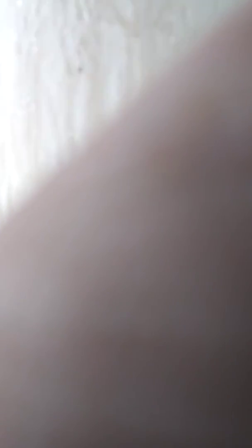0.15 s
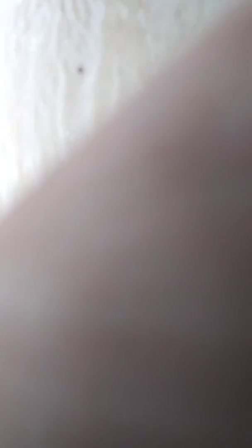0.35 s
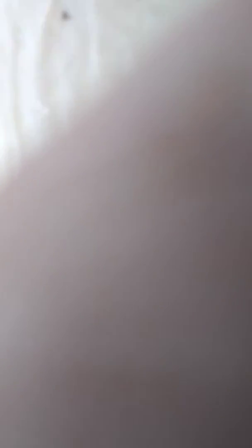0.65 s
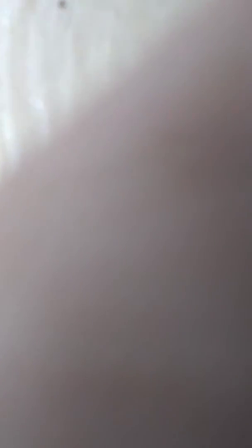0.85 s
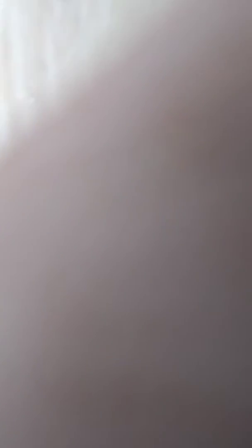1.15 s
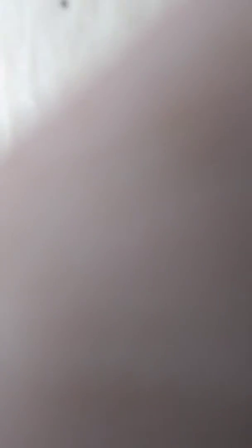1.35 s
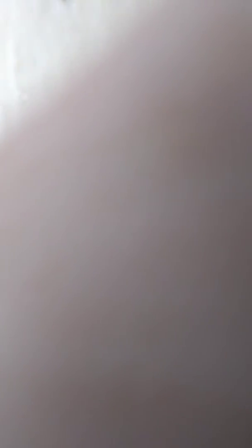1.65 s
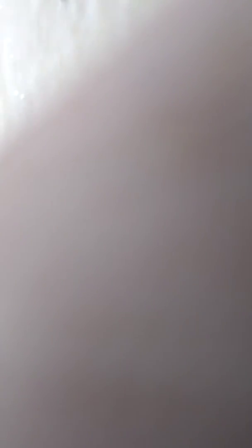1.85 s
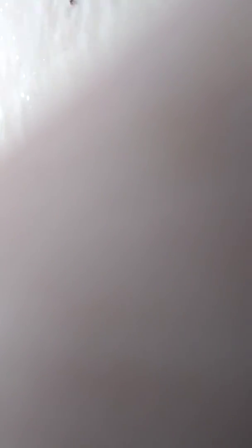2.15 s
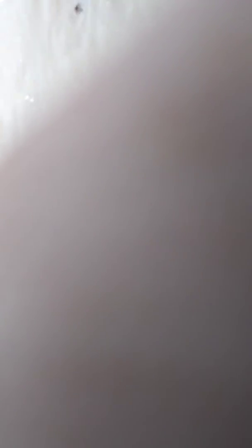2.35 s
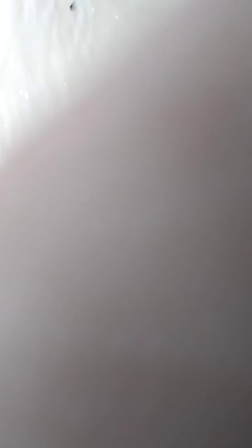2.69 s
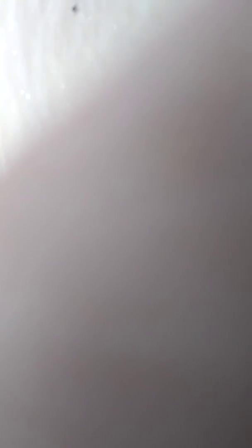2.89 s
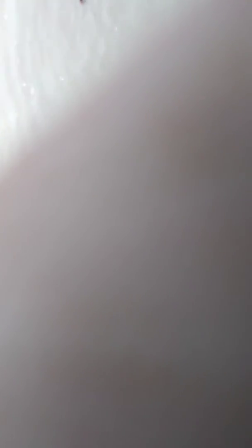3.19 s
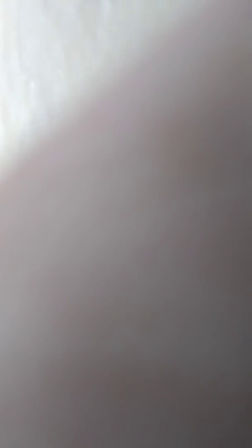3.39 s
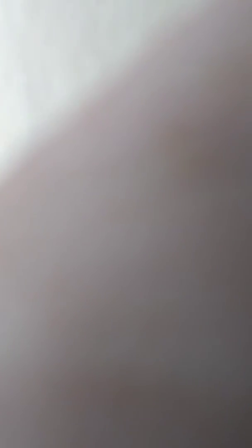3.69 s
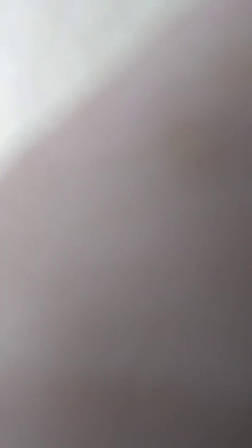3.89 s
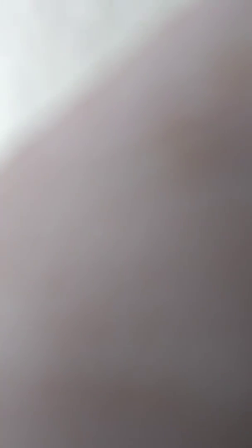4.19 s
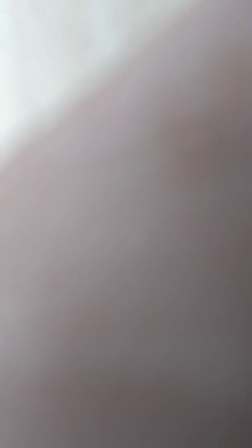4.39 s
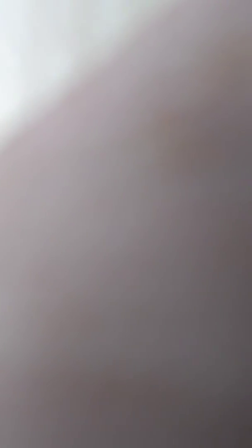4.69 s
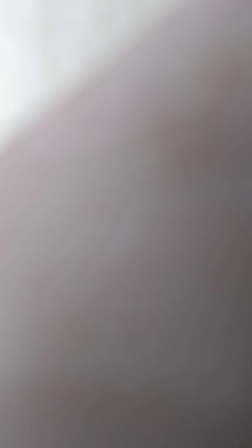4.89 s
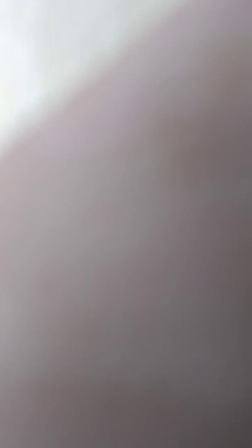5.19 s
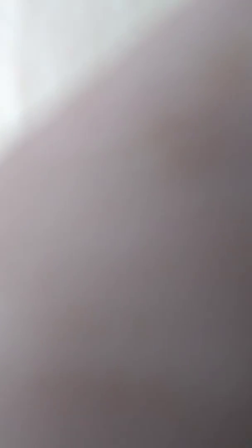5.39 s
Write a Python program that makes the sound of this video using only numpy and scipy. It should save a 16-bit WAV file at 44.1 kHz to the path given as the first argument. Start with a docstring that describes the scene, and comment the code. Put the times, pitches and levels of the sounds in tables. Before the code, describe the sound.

Outdoors at a river, close to a phone microphone. Faint wet finger rubs on a bottle come first, then near silence. Water slaps the neck with two light knocks, and air escapes in uneven rising glugs among ticking droplets. After a lull, water rushes briefly past the opening, then a loud cluster of plops and splashes follows, thinning out at the end.

```python
"""Wet fingers rub a bottle in short strokes by stick-slip, while shaped noise gives stretches of river
noise let through by a phone's noise gate, near silence between. Brief single-pitch tones plop, thump and
click; water slaps the neck with a push of pressure, a dull thud and spray. Droplets tick, two knocks
ring the wall, then air leaves in glugs, swelling sines that mostly climb in pitch as each bubble nears
the surface. Later, water rushes past the open neck for a moment, before the last glugs and slaps."""
import sys
import numpy as np
from scipy import signal
from scipy.io import wavfile
from scipy.ndimage import uniform_filter1d, map_coordinates

SR = 44100
rng = np.random.default_rng(int(sys.argv[2]) if len(sys.argv) > 2 else 0)


def wav_out(sig):
    """Save sig, one row per channel (or a flat mono array), as 16-bit PCM at SR to the path in sys.argv[1]."""
    wavfile.write(sys.argv[1], SR, np.round(np.clip(np.atleast_2d(sig).T, -1, 1) * 32767).astype(np.int16))


N = 244578

ATTACK_S, RELEASE_S = 0.0071, 0.014  # onset of a stretch; decay constant after a stretch or rub


def undb(db):
    """Level law: the amplitude gain of a level in dB."""
    return 10 ** (np.asarray(db) / 20)


def unit_rms(x):
    """Normalisation: scales a signal to an rms of 1."""
    return x / np.sqrt(np.mean(x ** 2))


def add(out, start_s, x):
    """Superposition: mixes x into out from start_s on."""
    i = max(int(start_s * SR), 0)
    out[i:i + len(x)] += x[:N - i]


def walk(rate_hz):
    """Slow random modulation: levels held 1 / rate_hz and smoothed twice; spread near 1."""
    hold = int(SR / rate_hz)
    steps = np.repeat(rng.standard_normal(N // hold + 1), hold)
    return 2.59 * uniform_filter1d(uniform_filter1d(steps, hold), hold)[:N]


def grains(length, depth_db):
    """Intermittency: random gain steps of length samples, exponential in dB, make noise crackle."""
    heights = np.minimum(rng.exponential(size=N // length + 1), 3)
    return undb(depth_db * heights).repeat(length)[:N]


def patches(bins, frames, shape):
    """Smooth random field over frequency and time, spread 1, in patches of the given size."""
    field = rng.standard_normal((int(shape[0] / bins) + 2, int(shape[1] / frames) + 2))
    rows, columns = np.arange(shape[0]) / bins, np.arange(shape[1]) / frames
    field = map_coordinates(field, np.meshgrid(rows, columns, indexing="ij"), order=1)
    return field / field.std()


def coloured(spectrum, broad_db, fine_db, grain_db=0.):
    """Spectral shaping: noise of rms 1 whose broad and narrow bands flicker independently."""
    hz, density_db = np.transpose(spectrum)
    noise = rng.standard_normal(N) * grains(64, grain_db)
    f, _, z = signal.stft(noise, SR, nperseg=1024, noverlap=768)
    colour_db = np.interp(np.log(f + 1), np.log(hz), density_db, left=-200, right=-200)[:, None]
    flicker_db = broad_db * patches(14., 5.4, z.shape) + fine_db * patches(2.2, 9., z.shape)
    shaped = signal.istft(z * undb(colour_db + flicker_db), SR, nperseg=1024, noverlap=768)[1][:N]
    return unit_rms(shaped)


def pocket(rise_s, fall_s, start_hz, peak_hz, end_hz, wobble):
    """Bubble resonance: a pocket of air sounds as a sine that swells, glides, and breaks off."""
    t = np.arange(-1.2 * rise_s, 1.9 * fall_s, 1 / SR)
    after = np.maximum(t, 0) / fall_s
    glide_in = t / rise_s * np.log(peak_hz / start_hz)
    glide_out = np.tanh(after * 0.93) / np.tanh(.8) * np.log(end_hz / peak_hz)
    glide = np.where(t < 0, glide_in, glide_out)
    swell = np.sin(np.pi / 2 * np.clip(1 + t / (1.246 * rise_s), 0, 1)) ** 2
    die = np.exp(-1.1 * after - 0.88 * after ** 4)
    shake = np.resize(wobble, len(t))
    hz = np.minimum(peak_hz * np.exp(glide + 0.027 * shake), .4 * SR)
    # reversed, the same wobble shakes the level out of step with the pitch
    return swell * die * undb(1.7 * shake[::-1]) * np.sin(2 * np.pi * np.cumsum(hz) / SR)


def gurgle(count=900):
    """Bubble cloud: many small resonances at random moments sum to a trickle; rms 1."""
    out, still = np.zeros(N), np.zeros(1)
    for when, size, climb, loud in rng.random((count, 4)):
        hz = 330. * 3.5 ** size
        bubble = pocket(1.2 / hz, 4.9 / hz, hz, hz, hz * (1 + 0.29 * climb), still)
        add(out, when * N / SR, undb(-10. * loud - 1.0 * size) * bubble)
    return unit_rms(out)


def ring(x, hz, width_hz, level_db):
    """Forced resonance: x drives a sum of steep, doubled peaks; rms 1."""
    out = np.zeros(len(x))
    for f, width, db in zip(hz, width_hz, level_db):
        peak = np.hstack(signal.iirpeak(f, f / width, fs=SR))
        out = out + undb(db) * signal.sosfilt([peak, peak], x) / np.sqrt(width)
    return unit_rms(out)


# share of the deepest bass over time, fuller while the bottle glugs, whole at 0 dB and above:
# (time_s [s], level_db [dB])
BASS_SHARE = [(1.0, -14), (1.151, 2.5), (3.1, -5.5), (3.3, -12.5), (4.35, -6.5), (4.45, -3)]
DEEP_HZ = 125


def low_cut(x):
    """High-pass filtering: lets only a changing share of the deepest bass through."""
    top = signal.sosfilt(signal.butter(2, DEEP_HZ, "high", fs=SR, output="sos"), x)
    share = np.minimum(undb(np.interp(np.arange(N) / SR, *np.transpose(BASS_SHARE))), 1)
    return top + share * (x - top)


# stretches of river noise let through by the phone's noise gate, which shuts between them:
# (start_s [s], length_s [s], slosh_db [dB], trickle_db [dB], drift_db by the end [dB])
OPEN_STRETCHES = [(0.047, 0.026, -53, -58, -10), (0.083, 0.093, -52.5, -62.5, -2),
                  (0.197, 0.038, -38.5, -70, -10), (0.254, 0.036, -51, -58.5, -4.5),
                  (0.346, 0.079, -48, -63.5, -1.5), (0.834, 0.12, -57.5, -84, 7.5),
                  (1.091, 0.048, -62, -66.5, -1.5), (1.134, 0.078, -43.5, -60.5, -4),
                  (1.245, 0.011, -41.5, -61.5, -2), (1.282, 0.15, -48, -61, 7.5),
                  (1.448, 0.17, -47, -44, -2.5), (1.64, 0.12, -38.5, -43, -6), (1.76, 0.07, -54, -49, -5.5),
                  (1.875, 0.2, -48, -62, -5), (2.035, 0.047, -63.5, -52, -1),
                  (2.107, 0.17, -53, -57.5, 7.5), (2.267, 0.13, -81, -53.5, 5.5),
                  (2.407, 0.054, -67.5, -53, -1), (2.458, 0.085, -53, -56, 1),
                  (2.555, 0.17, -47.5, -42.5, -7.5), (2.713, 0.08, -68, -46.5, 6),
                  (2.8, 0.2, -47.5, -45.5, -5), (2.99, 0.11, -78, -38.5, -24.5),
                  (3.079, 0.064, -49, -51, -10), (3.207, 0.11, -53.5, -61, 1.5),
                  (3.334, 0.17, -52, -50, -5), (3.543, 0.071, -45, -59, -4), (3.766, 0.08, -41, -46, -10),
                  (3.864, 0.29, -50, -62, -4), (4.273, 0.07, -72, -69.5, -5.5),
                  (4.401, 0.032, -46, -27.5, -10), (4.464, 0.17, -53, -48.5, 4),
                  (4.65, 0.21, -42, -40, -6.5), (4.865, 0.15, -51, -43.5, -7),
                  (5.039, 0.053, -53.5, -50.5, 2), (5.088, 0.11, -43, -42, -11),
                  (5.197, 0.085, -65, -55, -1.5), (5.296, 0.056, -52, -56.5, 1),
                  (5.376, 0.084, -57, -54.5, -16.5), (5.484, 0.071, -45, -56.5, -3.5)]
# swells of fine hiss: (peak_s [s], rise_s [s], fall_s [s], level_db before the edge falls [dB])
HISS_SWELLS = [(0.13, 0.045, 0.057, -60.5), (0.22, 0.023, 0.034, -62.5), (0.41, 0.025, 0.035, -66.5),
               (0.9, 0.076, 0.079, -69), (1.18, 0.061, 0.062, -56), (1.39, 0.1, 0.086, -64),
               (1.56, 0.09, 0.27, -53), (2.089, 0.013, 0.013, -64.5), (2.391, 0.067, 0.073, -61),
               (2.55, 0.047, 0.074, -62.5), (2.66, 0.046, 0.059, -56), (3.008, 0.024, 0.089, -66.5),
               (3.95, 0.081, 0.051, -58), (4.079, 0.093, 0.078, -51.5), (4.42, 0.0098, 0.057, -60.5),
               (4.52, 0.057, 0.1, -62), (4.749, 0.055, 0.13, -57), (5.109, 0.052, 0.04, -59)]
# spectra of low slosh, small bubbles and fine hiss: (frequency_hz [Hz], density_db [dB per Hz])
SLOSH_SPECTRUM = [(25, -43), (50, -10), (90, 1.5), (200, -3.5), (330, -10), (500, -24.5), (900, -76)]
TRICKLE_SPECTRUM = [(150, -19), (250, -4), (512, -6.5), (680, -3.5), (1090, -2.5), (1670, -13),
                    (2290, -20.5), (2800, -47), (3640, -37), (6160, -120)]
HISS_SPECTRUM = [(1180, -17.5), (2000, 0), (2280, -6.5), (3140, -2.5), (3980, -7), (6140, -5.5), (8630, 0),
                 (9250, -5.5), (10600, -20), (16000, -46.5)]
HISS_EDGE_DB = -17  # a swell's level one rise or fall off its peak
TRICKLE_HISS_DB, QUIET_DB = -25.5, -91.5  # hiss relative to its trickle; constant faint bed


def wash():
    """Gated noise: slosh and trickle pass in listed stretches; hiss swells over a faint bed."""
    t, gain = np.arange(int(.4 * SR)) / SR, np.zeros((2, N))
    for start_s, length_s, *levels_db, drift_db in OPEN_STRETCHES:
        edge = np.clip(t / ATTACK_S, 0, 1) * np.exp(-np.maximum(t - length_s, 0) / RELEASE_S)
        for layer, db in zip(gain, levels_db):
            add(layer, start_s, edge * undb(db + drift_db * np.minimum(t / length_s, 1)))
    slosh_gain, trickle_gain = gain
    hiss_gain = undb(TRICKLE_HISS_DB) * trickle_gain
    for peak_s, rise_s, fall_s, db in HISS_SWELLS:
        off = np.arange(N) / SR - peak_s
        hiss_gain += undb(db + HISS_EDGE_DB * np.where(off < 0, off / rise_s, off / fall_s) ** 4)
    trickle = 0.85 * coloured(TRICKLE_SPECTRUM, 5.5, 6., 3.) + 0.6 * gurgle()
    slosh = coloured(SLOSH_SPECTRUM, 3., 2., 2.)
    hiss = coloured(HISS_SPECTRUM, 2., 4.3, 2.)
    quiet = undb(QUIET_DB) * coloured(TRICKLE_SPECTRUM[:3] + HISS_SPECTRUM[2:], 3., 3.)
    return slosh_gain * low_cut(slosh) + trickle_gain * trickle + hiss_gain * hiss + quiet


# modes of the still empty bottle's wall, before damping by the hand, also rung by the knocks:
# (mode_hz [Hz], level_db [dB], t60_s [s])
WALL_MODES = [(425, -1, .03), (818, 1.5, .05), (930, 1, 0.15), (1236, -8, 0.1), (1680, -2, 0.035),
              (1940, -10, 0.2), (2207, -9, 0.028), (2490, -15, 0.25), (2640, -14.5, 0.044),
              (3183, -14, 0.15), (4320, -16, .06), (5200, -18, 0.06)]
# fingers sliding on the wall: (start_s [s], length_s [s], level_db at the start [dB])
FINGER_RUBS = [(0.046, 0.03, -66.5), (0.086, 0.085, -54), (0.196, 0.034, -58), (.264, 0.035, -58.5),
               (0.357, 0.069, -54), (0.841, 0.13, -65.5), (1.131, 0.081, -64.5)]
GRIP_T60_S, CLUMP_DB = 0.055, 1.75  # longest decay the hand allows; how far the slips come in clumps


def rubs():
    """Stick-slip friction: uneven slips of wet fingers ring the damped wall."""
    hz, mode_db, t60_s = np.transpose(WALL_MODES)
    gain, t = np.zeros(N), np.arange(int(.2 * SR)) / SR
    for start_s, length_s, db in FINGER_RUBS:
        edge = np.clip(t / 0.0035, 0, 1) * np.exp(-np.maximum(t - length_s, 0) / RELEASE_S)
        add(gain, start_s, undb(db - 60. * t) * edge)
    slips = rng.standard_normal(N) * undb(CLUMP_DB * walk(150)) * grains(32, 4.4)
    # nearly the same mode levels as the knocks
    return gain * ring(slips, hz, 5.4 / np.minimum(t60_s, GRIP_T60_S), 1.03 * mode_db)


# short plops, thumps and clicks, each a brief tone at one pitch:
# (peak_s [s], fall_ms [ms], pitch_hz [Hz], level_db before shaking [dB])
SHORT_TONES = [(0.091, 4.3, 350, -46.5), (0.135, 2.8, 268, -40), (0.155, 1.9, 308, -49),
               (0.267, 0.78, 1580, -34.5), (0.3575, 1, 1550, -37), (1.0, 4.1, 2220, -56.5),
               (0.27, 3.1, 275, -39), (0.361, 2.7, 270, -43), (0.379, 4.9, 250, -42),
               (4.426, 2, 1104, -20.5), (4.505, 4.7, 506, -29), (4.512, 2.2, 950, -31),
               (4.688, 2.2, 4120, -16), (5.012, 6, 1320, -47.5), (5.039, 3.1, 370.6, -28.5),
               (5.066, 4.7, 880, -36.5), (0.589, 2.4, 460, -56.5), (0.662, 18, 455, -61.5),
               (1, 5.3, 976, -44), (1.853, 8.6, 930, -45), (1.958, 5.1, 390, -35), (2.361, 6, 2170, -43),
               (2.381, 11, 2190, -40), (1.675, 14, 1750, -32), (2.588, 5.4, 957, -8),
               (2.636, 2.5, 505, -25), (2.988, 8.9, 1450, -36.5), (3.025, 40, 720, -32.5),
               (3.34, 2.9, 1090, -15.5), (3.391, 37, 1410, -39), (3.485, 9.9, 1810, -34),
               (3.56, 10.5, 996, -39.5), (4.309, 11, 1180, -46), (4.412, 6.6, 2020, -21),
               (4.478, 0.43, 820, -12), (4.576, 7.1, 1045, -25), (4.623, 6, 830, -34),
               (4.655, 4.9, 1010, -13), (4.66, 17.3, 1284, -13.5), (4.671, 5.4, 3570, -17),
               (4.6709, 2.1, 1674, -4.5), (5.126, 8.6, 494, -28), (5.198, 28, 490, -31),
               (5.308, 10.6, 868, -36)]
PLOP_RISE_CYCLES, PLOP_CLIMB_OCT = 1.6, 0.0056


def plops(wobble):
    """Damped oscillation: each brief tone rises within cycles and dies, its pitch and level shaken."""
    out = np.zeros(N)
    for peak_s, fall_ms, hz, db in SHORT_TONES:
        rise_s, fall_s = PLOP_RISE_CYCLES / hz, max(fall_ms, .5) / 1000
        plop = pocket(rise_s, fall_s, hz, hz, hz * 2 ** PLOP_CLIMB_OCT, wobble[int(peak_s * SR):])
        add(out, peak_s - 1.2 * rise_s, undb(db) * plop)
    return out


# water slapping the neck, levels and decay before the tail is cut short:
# (start_s [s], thud_db [dB], spray_db [dB], t60_s [s])
NECK_SLAPS = [(0.206, -46, -70, 0.14), (0.266, -38.5, -55, 0.024), (0.357, -48.5, -56.5, 0.073),
              (0.841, -55, -85, 0.31), (1.254, -57, -60.5, 0.066), (1.295, -26, -45, 0.049),
              (1.362, -32.5, -38.5, 0.076), (1.458, -27.5, -36, 0.09), (1.472, -19.5, -27.5, 0.15),
              (1.486, -18, -19, 0.031), (1.494, -28, -17, 0.025), (1.693, -20, -60, 0.016),
              (2.129, -45, -55, 0.015), (2.603, -27, -51, 0.2), (2.744, -24, -64, 0.03),
              (2.986, -53, -46, 0.15), (3.338, -20.5, -76, 0.071), (3.561, -41, -70, 0.33),
              (3.772, -30, -88.5, 0.11), (4.409, -21, -35.5, 0.097), (4.45, -27, -45, 0.037),
              (4.476, -20, -33, 0.037), (4.49, -29.5, -43, 0.073), (4.5, -20, -26.5, 0.031),
              (4.583, -10.5, -61.5, 0.021), (4.658, -18.5, -40, 0.15), (4.67, -25, -17.5, 0.051),
              (4.68, -17, -37, 0.12), (4.684, -24, -8.5, 0.028), (4.907, -26, -81, 0.13),
              (5.03, -39, -59.5, 0.079), (5.101, -18, -67, 0.16), (5.307, -34.5, -64.5, 0.19),
              (5.388, -43, -99.5, 0.19), (5.489, -33.5, -102.5, 0.084)]
# spectra of dull thud and fine spray: (frequency_hz [Hz], density_db [dB per Hz])
THUD_SPECTRUM = [(35, -44), (60, -11.5), (435, 7.5), (986, -0.5), (1460, -6), (1990, -19), (3000, -53.5),
                 (3900, -54), (6600, -120)]
SPRAY_SPECTRUM = [(1180, -28), (2000, -4), (2670, -14.5), (3680, -4), (6820, -8), (8780, -7),
                  (10200, -22.5), (16000, -32.5)]


def slaps():
    """Impact radiation: a push of pressure, then a dull thud and spray dying together."""
    push, thud, spray = np.zeros(N), np.zeros(N), np.zeros(N)
    t = np.arange(int(.3 * SR)) / SR
    crest = 0.85  # noise peaks well above its rms
    blow = np.sin(2 * np.pi * 400.0 * t) * np.exp(-t / 0.0031)
    for start_s, db, spray_db, t60_s in NECK_SLAPS:
        # the tail is cut short as the phone's noise gate closes
        shape = (1 - np.exp(-t / 0.002)) * undb(-60 * t / max(t60_s, .01) - 17000.0 * t ** 2)
        add(push, start_s, undb(db - 4.0) * blow)
        add(thud, start_s, undb(db) * crest * shape)
        add(spray, start_s, undb(spray_db) * shape * (1 - np.exp(-t / 0.0015)))
    mist = coloured(SPRAY_SPECTRUM, 1.5, 3., 2.6)
    return push + thud * low_cut(coloured(THUD_SPECTRUM, 0.92, 1.9)) + spray * mist


# droplets and small ticks: (start_s [s], level_db [dB], pitch_hz [Hz])
DROPLETS = [(1.276, -47.5, 9100), (1.399, -40.5, 4530), (1.4682, -19.5, 8860), (2.0754, -37, 3300),
            (2.084, -32, 4500), (2.183, -26, 2393), (2.275, -43, 2080), (2.3006, -32.5, 3110),
            (2.301, -33, 5900), (2.316, -30, 5630), (2.361, -24, 3540), (2.378, -22.5, 5240),
            (2.4152, -46, 4300), (2.475, -38.5, 5600), (2.51, -37, 2100), (2.5155, -32.5, 3850),
            (2.535, -29, 4930), (2.5747, -33, 4800), (2.578, -31.5, 2130), (2.6148, -36, 8500),
            (2.646, -34, 8300), (2.775, -33, 3240), (2.813, -42, 6230), (2.816, -44, 2350),
            (2.9431, -40.5, 5480), (2.987, -37.5, 4440), (3.071, -45.5, 6200), (3.082, -42.5, 5500),
            (3.1293, -45, 6130), (3.152, -52, 6450), (3.38, -44, 8350), (3.4926, -37.5, 8490),
            (3.6807, -37, 8080), (4.418, -26.5, 5270), (4.4773, -23.5, 3230), (4.6, -42, 4300),
            (4.632, -38.5, 3300), (4.6615, -16, 3160), (4.7312, -34, 3480), (4.946, -39.5, 4020),
            (5.33, -55.5, 2200), (5.402, -49, 2110)]
FIZZ_CYCLES = 620  # t60 of the fizz, in cycles of the ring


def drops():
    """Entrained-bubble ringing: a droplet ticks, rings a few cycles and leaves a narrow fizz."""
    out = np.zeros(N)
    t = np.arange(int(.2 * SR)) / SR
    for start_s, db, hz in DROPLETS:
        tone = np.sin(2 * np.pi * hz * t) * np.exp(-t * hz / 10.8)
        band = signal.butter(3, [hz / 1.165, min(hz * 1.262, 9800.)], "band", fs=SR, output="sos")
        decay = 0.55 * np.exp(-t / 0.00035) + 0.32 * undb(-60 * t * hz / FIZZ_CYCLES)
        fizz = signal.sosfilt(band, rng.standard_normal(len(t)) * decay)
        soft = np.sin(np.pi / 2 * np.minimum(t * hz / 3, 1)) ** 2  # onset over three cycles
        add(out, start_s, undb(db) * soft * (0.8 * tone + fizz))
    return out


# knocks on the bottle before it goes under: (start_s [s], level_db [dB])
BOTTLE_KNOCKS = [(1.296, -52.5), (1.368, -39)]


def knocks():
    """Modal ringing: each knock excites every mode of the wall by a different amount."""
    out = np.zeros(N)
    t = np.arange(int(.25 * SR))[:, None] / SR
    hz, mode_db, t60_s = np.transpose(WALL_MODES)
    for start_s, db in BOTTLE_KNOCKS:
        chance = rng.standard_normal(len(hz))
        tones = np.sin(2 * np.pi * hz * (1 + 0.005 * chance) * t)
        modes = tones * undb(-60 * t / np.clip(t60_s, .02, .4)) * np.minimum(t / 0.0033, 1)
        add(out, start_s, modes @ undb(db + mode_db + 1.0 * chance))
    return out


# pockets of air that swell and glide, mostly upwards: (peak_s [s], rise_ms [ms], fall_ms [ms],
# pitch_hz at the peak [Hz], climb [octaves per s], level_db before shaking [dB])
GLIDING_POCKETS = [(1.311, 5.3, 24, 147, 11, -30), (1.374, 4.6, 41.5, 181.5, 9, -17),
                   (1.417, 2.5, 36, 1266, 6, -39), (1.487, 20.3, 12.5, 1304, 7.5, -26.5),
                   (1.493, 11, 16, 343.5, 0, -23.5), (1.515, 3, 6.7, 3200, 37, -33),
                   (1.601, 4.3, 53, 635, 5.5, -37.5), (1.699, 3.7, 21, 648, 34.5, -19.5),
                   (1.719, 46, 17, 123.5, 2.5, -35.5), (1.948, 40, 57, 96.8, 6.5, -45.5),
                   (1.99, 16, 33.6, 590, 18.5, -33.5), (2.158, 32, 34, 99.4, 16.5, -35),
                   (2.185, 4, 7.8, 2163, 71, -35), (2.137, 4.2, 47, 269.4, 10.5, -35),
                   (2.197, 40, 27.8, 496, 23, -27), (2.329, 50, 31, 126, 19, -33),
                   (2.34, 8.9, 18, 690, 8, -42), (2.362, 2.5, 21, 684, 15, -34),
                   (2.478, 19, 19.4, 92.6, 25, -25.5), (2.541, 12.7, 3.9, 352, -8, -27.5),
                   (2.55, 9.4, 22, 564, 10, -36.5), (2.589, 2, 24.3, 1490, 12, -30),
                   (2.596, 1.8, 18.6, 1084, 11.5, -22), (2.607, 3.17, 1.9, 614, 5, -22.5),
                   (2.653, 18.7, 23, 99, 14, -36), (2.751, 20.6, 15.2, 520, 16.5, -20.5),
                   (2.775, 2.3, 28, 633, 38.5, -33.5), (2.808, 17.4, 8.6, 91, 8, -38),
                   (2.896, 38.3, 48, 493, 25, -23.5), (3.019, 14.6, 6.2, 463, 35, -29),
                   (3.239, 26.6, 17, 1006, 19, -44), (3.277, 5.2, 118, 208, 6, -33),
                   (3.361, 27, 52, 419, 19.5, -23.5), (3.486, 1.83, 32.8, 997, 16, -39),
                   (4.282, 3.4, 23, 1238, 2.5, -36), (4.418, 10.4, 15, 1057, 7.5, -33),
                   (4.426, 24.4, 10.4, 366, -7.5, -25.5), (4.482, 3.38, 6.9, 427, 17, -23.5),
                   (4.555, 13.6, 46, 372, 14.5, -38.5), (4.585, 3.15, 6.6, 860, 66, -16),
                   (4.589, 9.8, 13.4, 322, 0, -19.5), (4.691, 8.8, 8.2, 968, 9, -21),
                   (4.71, 10, 16, 112, 2.2, -30.5), (4.763, 44, 16.6, 1012, 29, -26),
                   (4.793, 25, 5, 514, 14, -29), (4.819, 4.4, 15, 253, 31, -29.5),
                   (4.876, 20.6, 31, 486, 8.5, -30.5), (4.893, 10, 19, 924, 15.5, -24),
                   (4.916, 6.5, 11, 1194, -6, -32.5), (4.937, 26, 12, 965, 29, -35),
                   (5.076, 1.5, 25, 1840, -6.5, -35.5), (5.112, 10, 7.8, 446.5, 9, -10),
                   (5.147, 29, 20.6, 1052, 26, -34.5), (5.178, 32, 22, 966, 29.5, -46.5),
                   (5.4, 19.3, 33, 657, 1.5, -39.5)]
GLUG_SHAKE, SHAKEN_HZ = .8, 610  # bigger pockets, pitched below SHAKEN_HZ, ring steadier


def glugs(wobble):
    """Bubble resonance: pockets, shaken by the water, glide at their own rates, mostly upwards."""
    out = np.zeros(N)
    for peak_s, rise_ms, fall_ms, hz, climb, db in GLIDING_POCKETS:
        rise_s, fall_s = max(rise_ms, .3) / 1000, max(fall_ms, .5) / 1000
        start_hz, end_hz = hz * 2 ** (-climb * rise_s), hz * 2 ** (climb * fall_s)
        shake = GLUG_SHAKE * min(hz / SHAKEN_HZ, 1) * wobble[int(peak_s * SR):]
        glug = pocket(rise_s, fall_s, start_hz, hz, end_hz, shake)
        add(out, peak_s - 1.2 * rise_s, undb(db) * glug)
    return out


# water rushing past the open neck: (time_s [s], level_db before wavering [dB])
NECK_RUSH = [(3.86, -90), (3.885, -52.5), (3.97, -54), (4.06, -48.5), (4.163, -53), (4.18, -82)]
# resonances of the rush, and a band of steady hiss near 8.5 kHz; drift counts from the rush's third row:
# (pitch_hz [Hz], width_hz [Hz], level_db [dB], drift [dB per s])
RUSH_BANDS = [(649, 180, 2.5, 34), (927, 135, 3, -0.5), (1658, 190, 2.5, -40), (2120, 130, -11, 19),
              (2690, 210, -7.5, 1.5), (8500, 1200, -2.5, 2)]


def rush():
    """Flow-excited resonance: wavering turbulence crosses the neck; the deeper resonances take over."""
    t = np.arange(N) / SR
    level_db = np.interp(t, *np.transpose(NECK_RUSH), left=-200, right=-200)
    level_db = level_db + 1.25 * walk(29.88) + 1.6 * walk(200)
    hz, width_hz, db, drift = np.transpose(RUSH_BANDS)
    since = np.clip(t, NECK_RUSH[0][0], NECK_RUSH[-1][0]) - NECK_RUSH[2][0]
    bands = ring(rng.standard_normal(N), hz, width_hz, db[:, None] + drift[:, None] * since)
    return undb(level_db) * bands


def scene():
    """Superposition: all sources reach one microphone in open air, without reflections."""
    wobble = walk(220)  # shared by plops and glugs
    return (wash() + rubs() + plops(wobble) + slaps() + drops() + knocks() + glugs(wobble) + rush())[None]


def record(dry):
    """Transducer response: the small microphone loses deep bass, peaks at its port and cuts the top."""
    thin = signal.sosfilt(signal.butter(3, 55., "high", fs=SR, output="sos"), dry)
    port = signal.lfilter(*signal.iirpeak(8600., 6., fs=SR), thin)
    top_cut = signal.ellip(8, .2, 70, 15850, fs=SR, output="sos")
    return signal.sosfilt(top_cut, thin + 0.15 * port)


dry = scene()
out = record(dry)
wav_out(out)
```